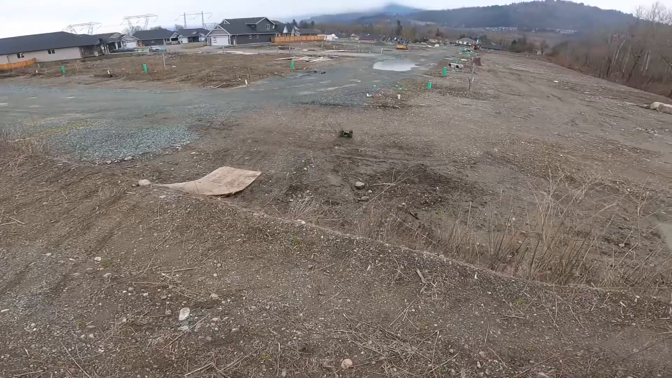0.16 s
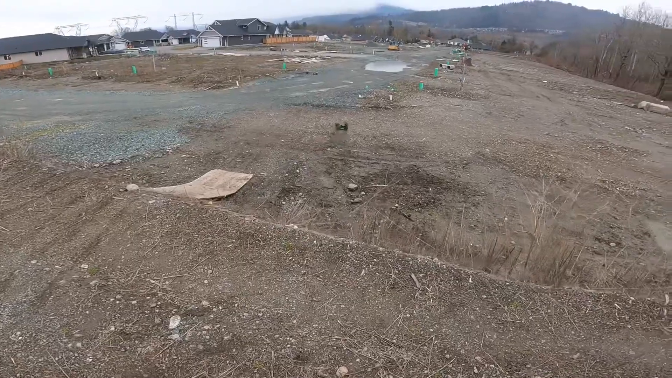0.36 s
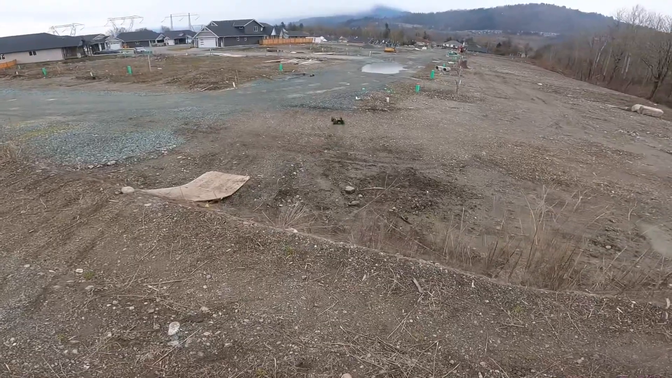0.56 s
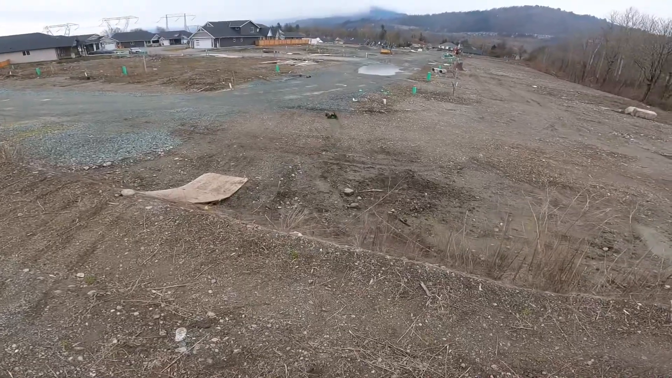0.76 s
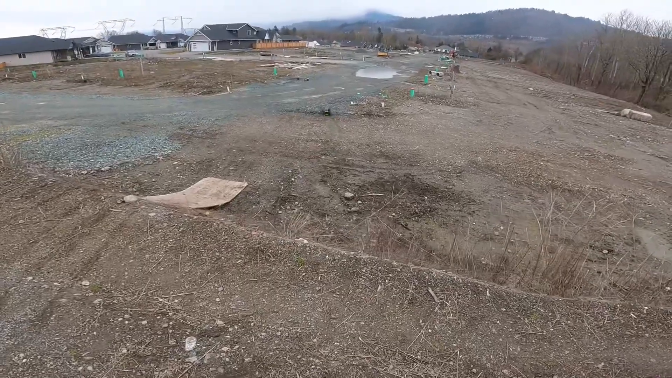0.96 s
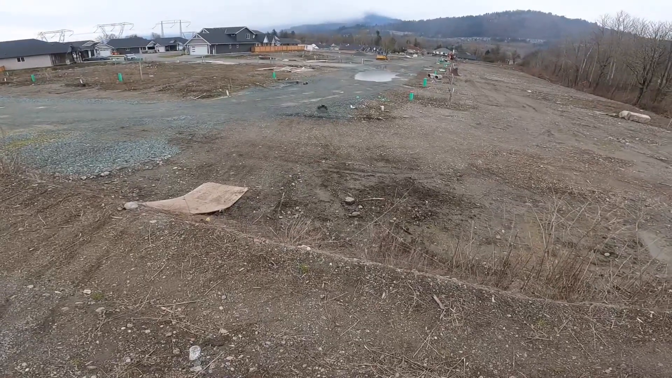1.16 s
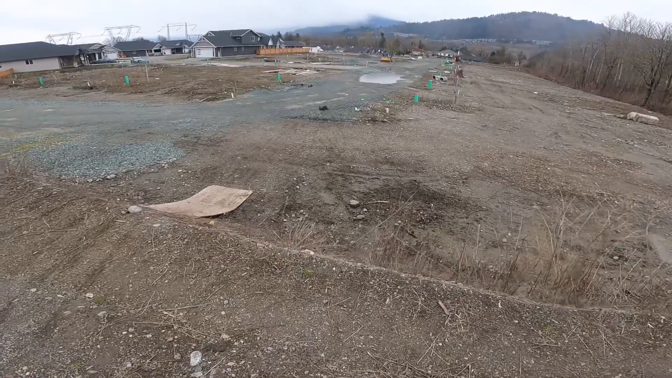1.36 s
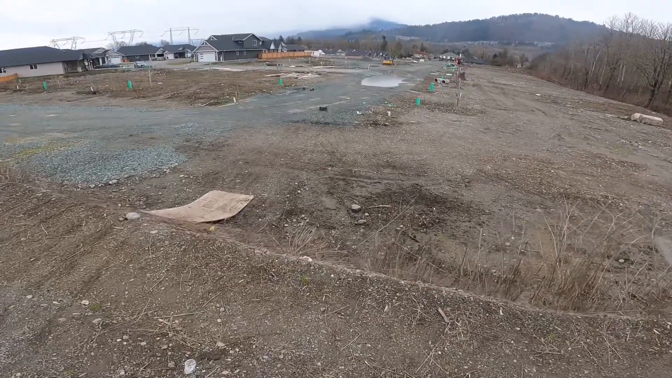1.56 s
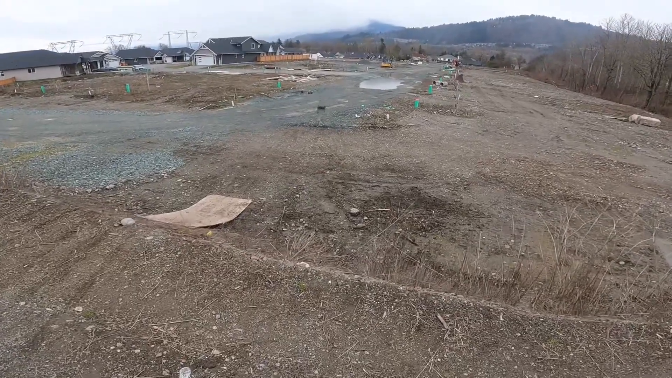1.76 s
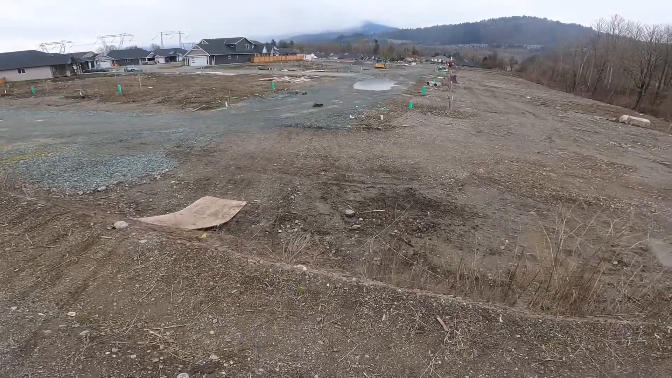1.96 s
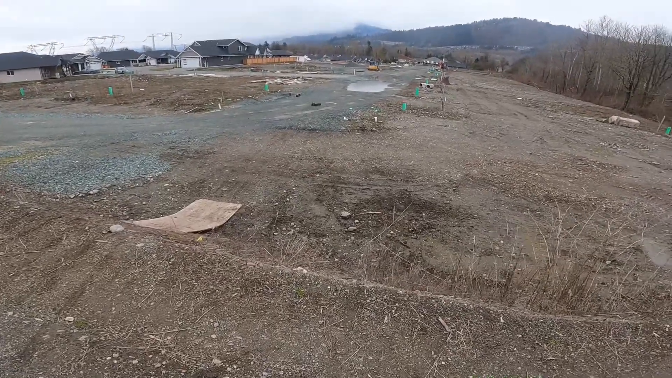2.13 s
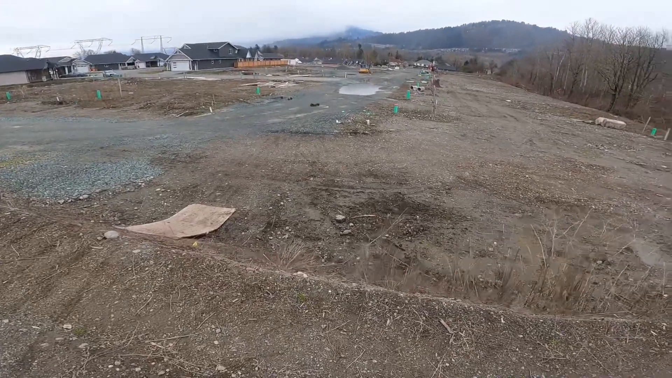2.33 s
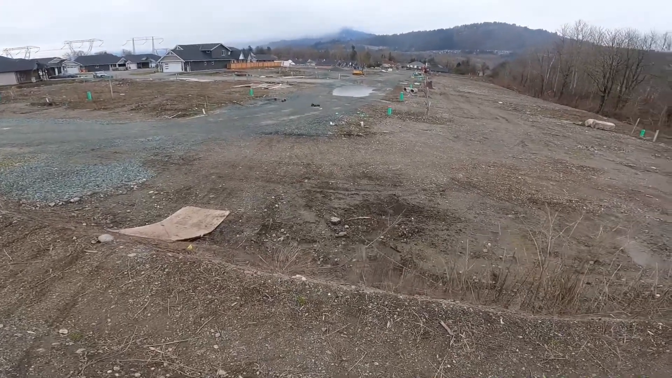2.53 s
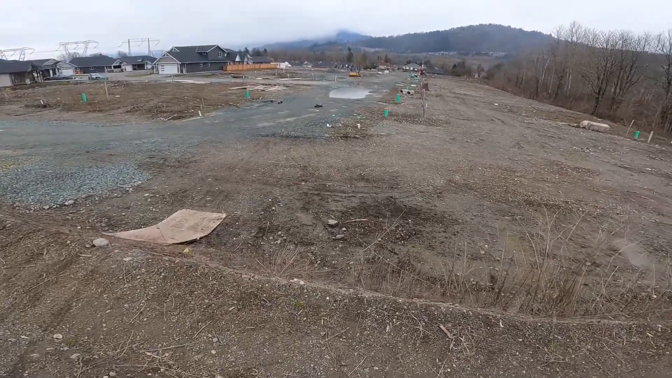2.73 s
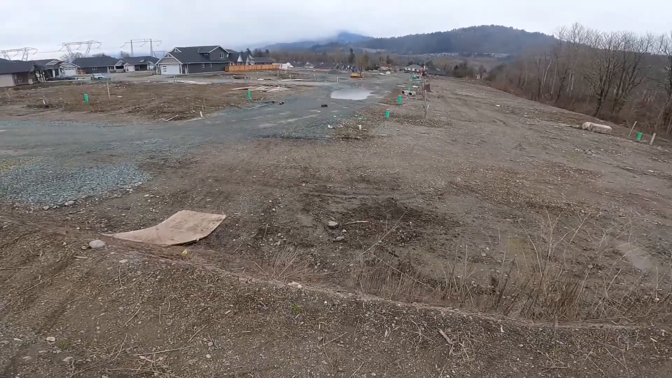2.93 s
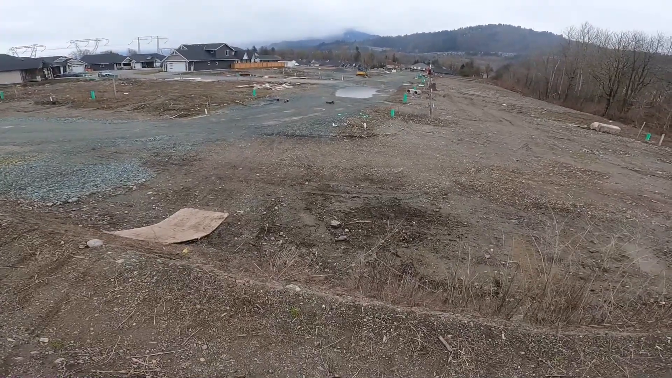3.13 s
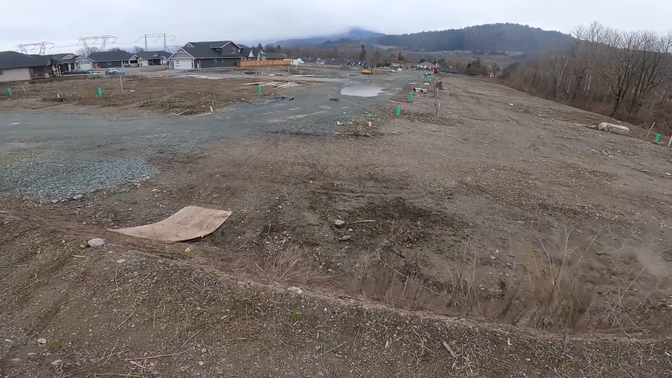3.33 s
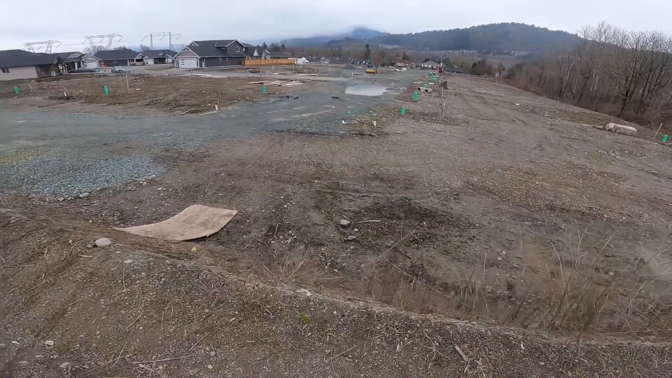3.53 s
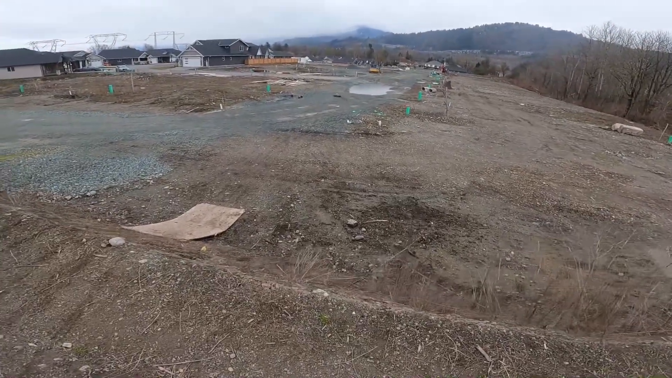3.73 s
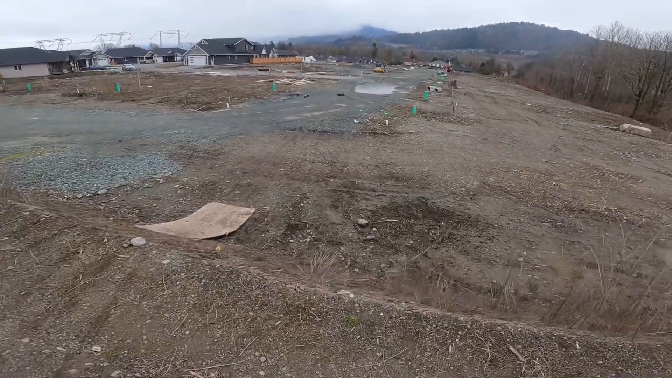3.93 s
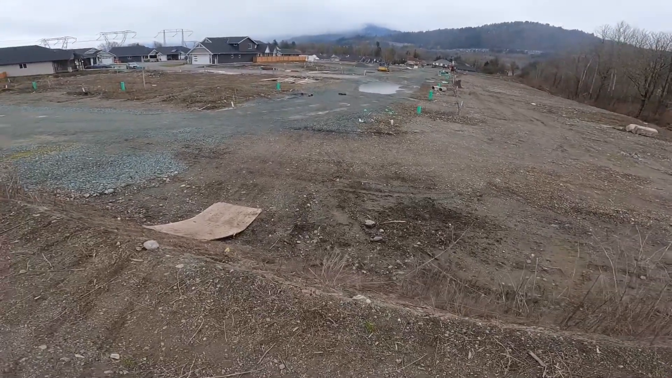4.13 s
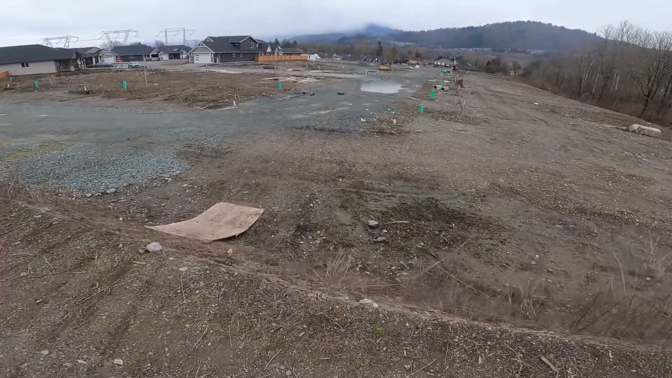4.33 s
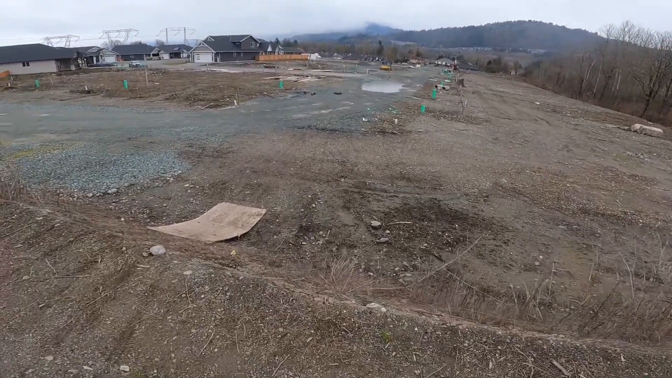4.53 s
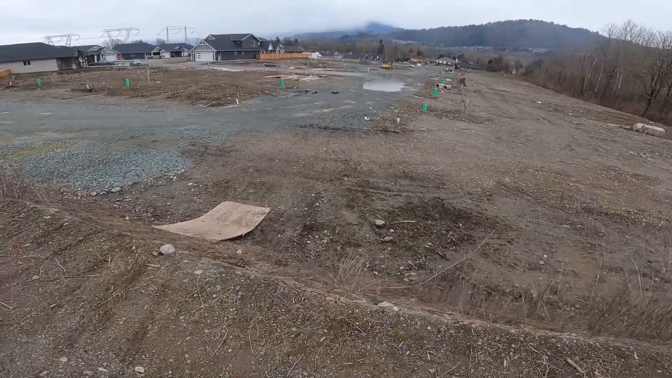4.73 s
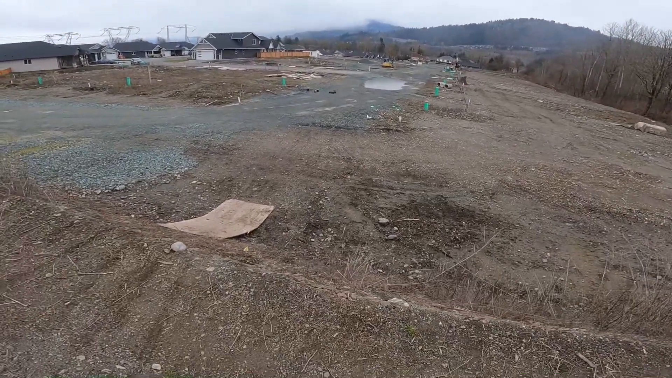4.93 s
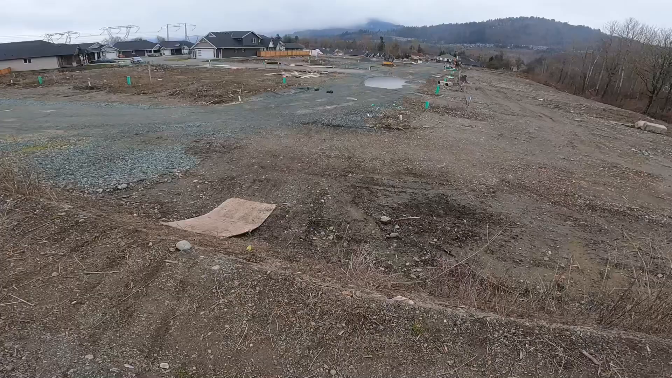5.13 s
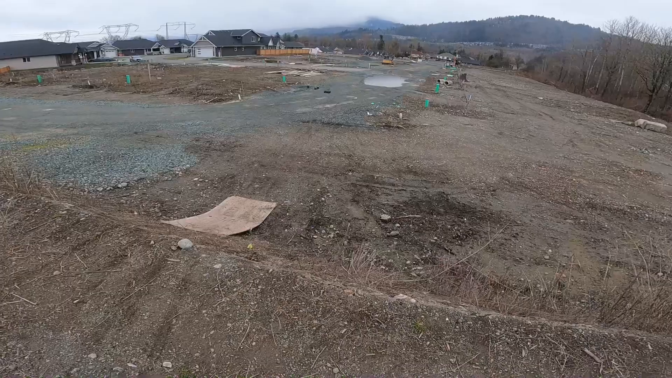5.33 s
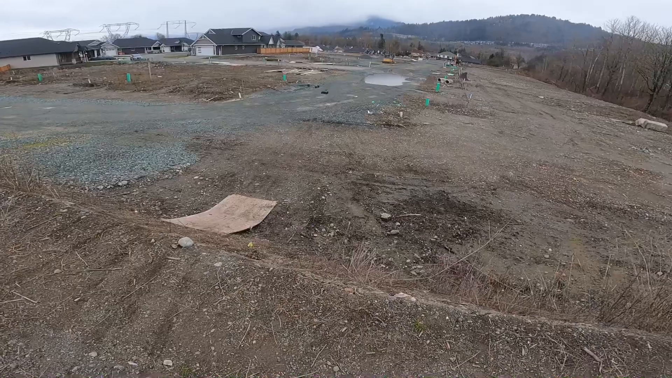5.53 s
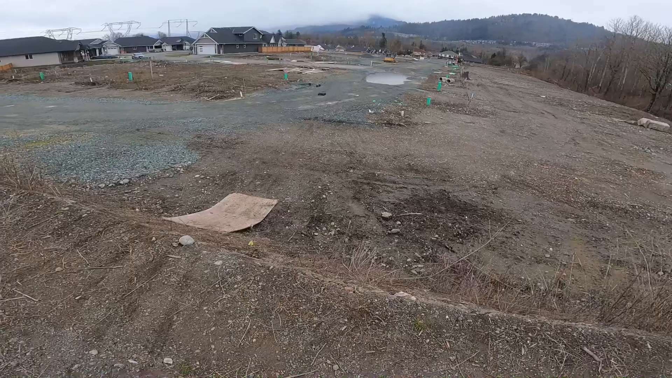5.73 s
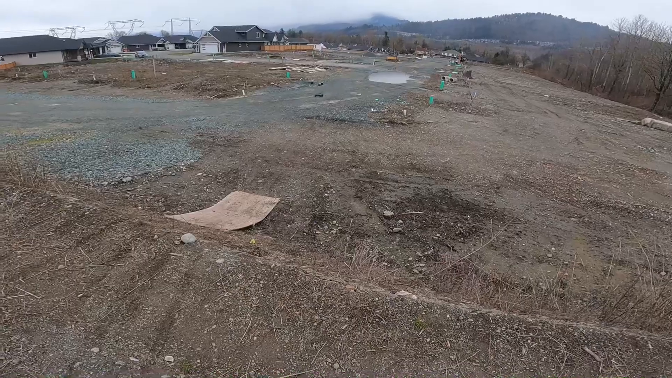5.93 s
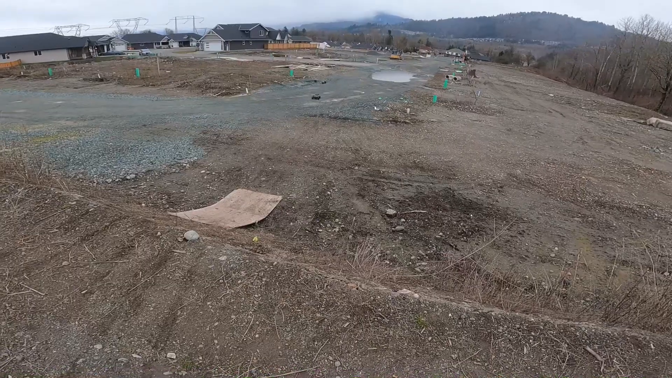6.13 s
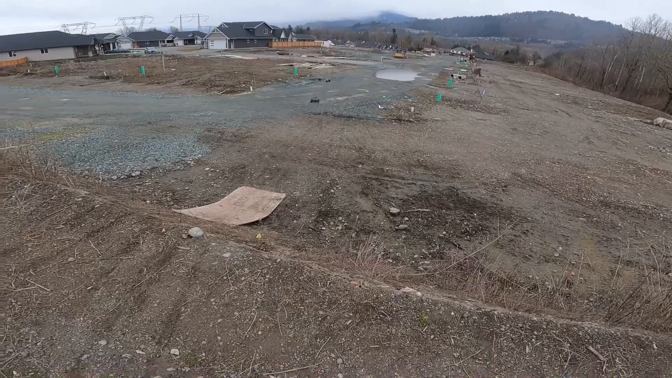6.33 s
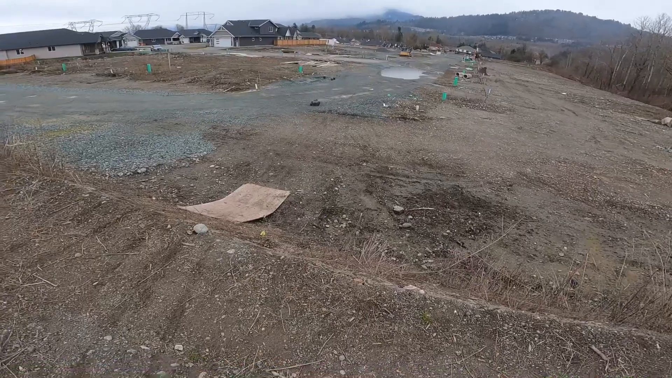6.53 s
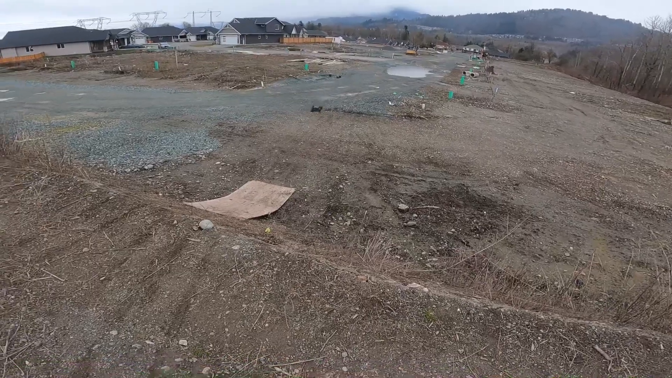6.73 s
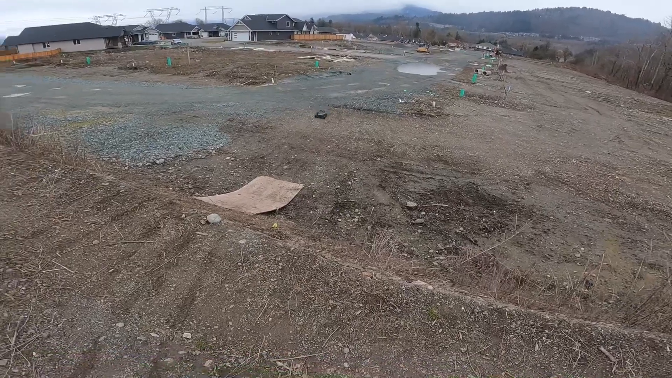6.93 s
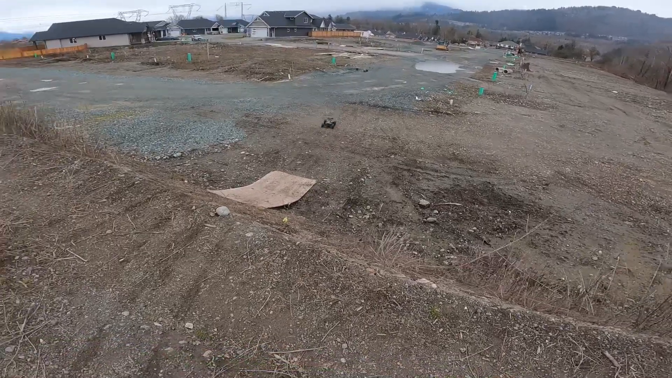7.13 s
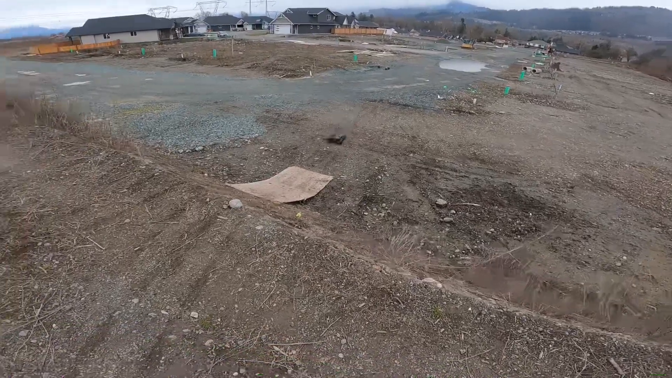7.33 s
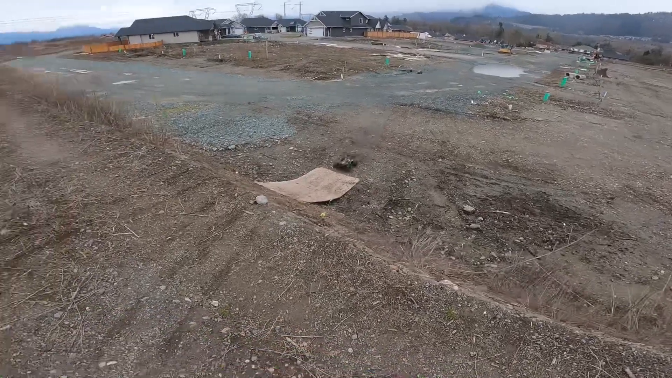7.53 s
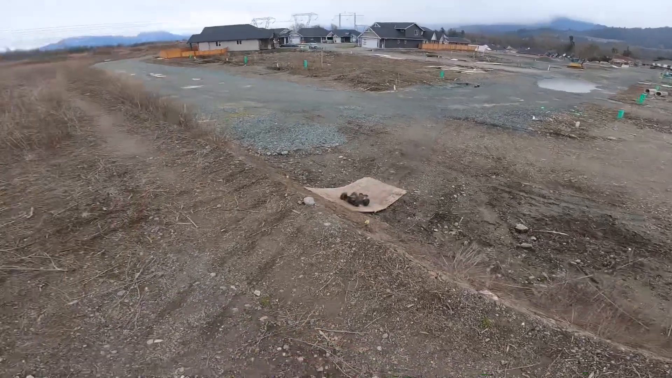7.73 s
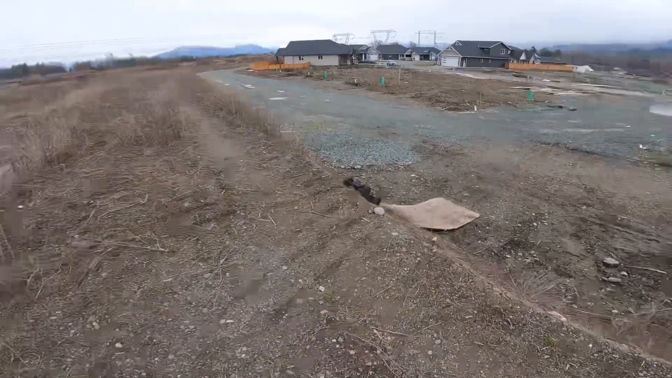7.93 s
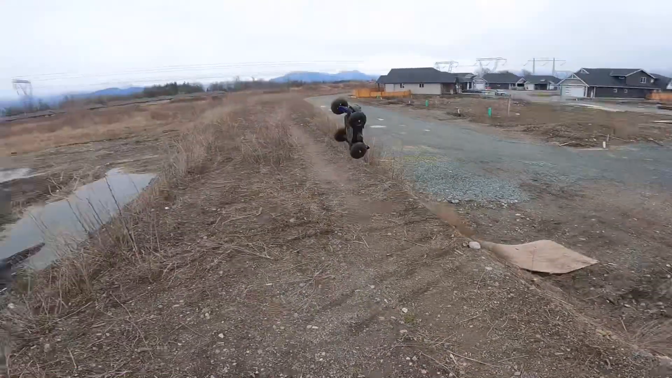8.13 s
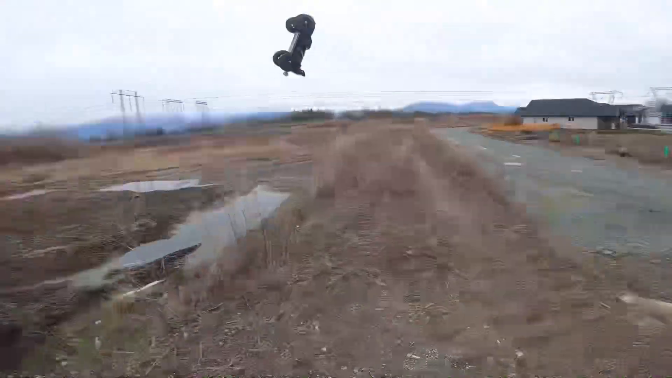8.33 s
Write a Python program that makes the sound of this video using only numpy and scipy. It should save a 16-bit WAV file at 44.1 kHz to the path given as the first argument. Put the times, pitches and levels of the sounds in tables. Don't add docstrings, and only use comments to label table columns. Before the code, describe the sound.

A small electric truck whines away over loose dirt, circles back faster, then clatters across a plywood ramp and whizzes past in the air.

```python
import sys
import numpy as np
from scipy import signal
from scipy.fft import rfft, irfft, next_fast_len
from scipy.io import wavfile
from scipy.ndimage import uniform_filter1d, map_coordinates

SR = 44100
rng = np.random.default_rng(int(sys.argv[2]) if len(sys.argv) > 2 else 0)


def magnitude_from_level(level_db):
    exponent = np.asarray(level_db, float) / 20
    return 10 ** exponent


def wrap_up_sound(samples):
    columns = np.atleast_2d(samples).T
    tamed = np.clip(columns, -1, 1)
    steps = np.round(tamed * 32767).astype(np.int16)
    wavfile.write(sys.argv[1], SR, steps)


N = 373527


def unit(x):
    return x / np.sqrt(np.mean(x ** 2) + 1e-20)


def along(points, hz):
    f, v = np.transpose(points)
    return np.interp(np.log(hz + 1), np.log(f + 1), v)


def curves(rows):
    s, *cols = np.transpose(rows)
    return [np.interp(np.arange(N) / SR, s, c) for c in cols]


def spans(rows, edge_s):
    t = np.arange(N) / SR
    return sum(db * np.clip(np.minimum(t - s, s + length - t) / edge_s, 0, 1) for s, length, db in rows)


def joined(tables):
    edges = [(table[end][0] + step, table[end][1]) for table in tables for end, step in ((0, -.012), (-1, .012))]
    alone = [e for e in edges if not any(t[0][0] <= e[0] <= t[-1][0] for t in tables)]
    played = [tuple(row) for table in tables for row in table]
    silent = [(s, hz, -99) for s, hz in alone]
    return curves(sorted(played + silent))


def wobble(rate):
    knots = rng.standard_normal(int(N * 400 / SR) + 4)
    return map_coordinates(knots, [np.arange(N) * min(rate, 400) / SR])


def coloured(x, spectrum):
    m = next_fast_len(N + 8192)
    gain = magnitude_from_level(along(spectrum, np.fft.rfftfreq(m, 1 / SR)))
    return irfft(rfft(x, m) * gain, m)[..., :N]


def rattle(spectrum, patchy_db, per_s, burst_s, share):
    z = signal.stft(rng.standard_normal(N), nperseg=512)[2]
    field = uniform_filter1d(rng.standard_normal(z.shape), size=5, axis=0)
    field = uniform_filter1d(field, size=8, axis=1)
    bed = signal.istft(z * magnitude_from_level(patchy_db * unit(field)), nperseg=512)[1][:N]
    size_db = 3.7 * np.clip(rng.standard_normal(N), -3, 1.4)
    hits = (rng.random(N) < per_s / SR) * magnitude_from_level(size_db)
    flares = signal.lfilter([1], [1, -np.exp(-1 / (burst_s * SR))], hits)
    return unit(coloured(bed * (1 + share * flares), spectrum))


def struck(events, cycles, noise, gain_db):
    out, t = np.zeros(N + SR), np.arange(SR // 8) / SR
    for s, db, hz in events:
        kernel = np.diff(np.hanning(int(SR / hz) + 3))
        rough = np.convolve(rng.standard_normal(len(t)), kernel, "same") * np.sqrt(SR / hz / 4)
        ring = np.sin(2 * np.pi * hz * t) + noise * rough
        out[round(s * SR):][:len(t)] += magnitude_from_level(db + gain_db - 60 * t * hz / cycles) * ring
    return out[:N]


# start in seconds, end in seconds, pitch in Hz, level in dB.
FAR_HUM = [
    (3.9, 5.5, 154, -50),
    (0, .5, 90, -52),
]


def far_hum():
    t = np.arange(N) / SR
    out = np.zeros(N)
    for start, end, hz, db in FAR_HUM:
        fade = np.clip(np.minimum(t - start, end - t) / 0.13, 0, 1)
        tone = np.sin(2 * np.pi * hz * t + 0.55 * wobble(16))
        out += magnitude_from_level(db + 0.59 * wobble(15.0)) * fade * tone
    return out


# peak time in seconds, peak level in dB.
GUSTS = [
    (0.0, -39),
    (1.01, -37),
    (1.82, -39.5),
    (2.14, -38),
    (2.6, -37),
    (3.39, -31.5),
    (4.17, -37),
    (7.1, -50),
    (7.83, -43),
]
# time in seconds, level in dB.
BREEZE = [(0, -58), (.9, -41), (1.25, -47), (2, -43.5), (7.9, -50.5), (8.2, -72)]
# frequency in Hz, density in dB per Hz.
BUFFET = [(8.8, -33), (15, 0), (53, 2.5), (123, -5), (170, -5), (220, -89), (370, -120)]


def wind():
    rise, fall = 37, 58
    t = np.arange(N) / SR
    gusts = [db - np.where(t < s, rise * (s - t), fall * (t - s)) for s, db in GUSTS]
    level_db = np.max([curves(BREEZE)[0], *gusts], axis=0)
    return magnitude_from_level(level_db) * rattle(BUFFET, patchy_db=1.3, per_s=9.1, burst_s=0.03, share=1.0)


# time in seconds, peak in dB.
SNAPS = [(0.0977, -39), (0.172, -37), (0.2079, -39), (0.3, -42), (0.3112, -36), (0.4264, -40), (0.549, -43),
         (1.507, -30), (1.53, -29.5), (1.747, -44), (1.915, -46), (2.0256, -35), (2.0895, -40),
         (2.196, -37), (2.4115, -33.5), (2.486, -36), (2.537, -37.5), (2.789, -46), (2.81, -54),
         (3.3136, -37), (3.4027, -46), (3.5523, -47), (3.5814, -51), (5.288, -40), (6.4198, -32),
         (7.7411, -20), (7.7567, -14.5), (7.7854, -33), (7.804, -11), (7.8118, -23), (8.0994, -24),
         (8.1397, -24)]
STALK_HZ = [2400, 6200]


def snaps():
    out, t = np.zeros(N + SR), np.arange(SR // 20) / SR
    for s, db in SNAPS:
        crackle = 0.54 * rng.standard_normal(len(t)) + (t == 0)
        out[round(s * SR):][:len(t)] += magnitude_from_level(db + 9 - 60 * t / 0.024) * crackle
    band = signal.butter(2, STALK_HZ, "bandpass", fs=SR, output="sos")
    return signal.sosfilt(band, out[:N])


# time in seconds, peak in dB, pitch in Hz.
BLOWS = [(1.417, -19, 192), (1.498, -15, 162), (2.09, -20, 164), (3.238, -20.5, 112), (3.391, -18, 70),
         (3.44, -22, 72.87), (6.781, -13, 182), (7.581, -8, 210.4), (7.669, -8, 210), (7.705, -7.5, 190),
         (7.727, -4.5, 120.4), (7.768, -16, 129), (7.81, -3, 106), (7.87, -12, 124.5), (7.888, -18, 95),
         (8.009, -10, 291), (8.03, -21, 62.2)]
# time in seconds, peak in dB, pitch in Hz.
SLAPS = [(0.311, -28, 2060), (0.3115, -23, 950), (0.312, -25, 3600), (1.507, -21.5, 1040),
         (1.529, -24, 2370), (2.486, -22.5, 3280), (3.099, -25, 1200), (3.383, -23.5, 1800),
         (3.386, -26, 2570), (3.39, -32, 3200), (3.388, -23, 970), (7.59, -8.5, 1060), (7.705, -4.5, 1450),
         (7.768, -1, 1530), (7.804, -6, 1070), (7.855, -5, 870), (7.888, -11, 1020), (8.097, -20, 2513),
         (8.11, -12, 1700), (8.119, -12, 1330), (8.127, -12, 1440), (8.128, -13, 3700), (8.134, -21, 1050),
         (8.152, -15, 1050), (8.172, -17, 1000), (8.177, -9.5, 1696), (8.176, -16, 3400)]
# time in seconds, peak in dB, pitch in Hz.
PINGS = [(0.3087, -40, 7000), (1.4336, -36, 6500), (1.785, -46, 5480), (1.9699, -43.5, 6940),
         (2.0108, -44, 7220), (2.287, -44, 7500), (3.1692, -41, 5800), (3.458, -48, 5500),
         (3.468, -44, 5300), (7.707, -21, 10000), (7.742, -26, 9100), (7.756, -20, 9700),
         (7.764, -23, 7100), (7.771, -23, 7000), (7.776, -25, 6760), (7.78, -23, 6900), (7.786, -21, 9760),
         (7.8035, -26, 9000), (7.8125, -23, 9700), (7.854, -27, 9500), (7.862, -27, 9800),
         (7.888, -30, 10400)]


def impacts():
    blows = struck(BLOWS, cycles=17.0, noise=0.47, gain_db=-7.0)
    slaps = struck(SLAPS, cycles=33, noise=0.6, gain_db=-6.5)
    return blows + slaps + struck(PINGS, cycles=55, noise=0.4, gain_db=-3)


# start in seconds, length in seconds, drumming lost in dB.
HOPS = [(0.026, 0.14, 4), (1.13, 0.28, 12), (2.447, 0.17, 6), (2.744, 0.2, 2.5), (3.292, 0.088, 7),
        (6.574, 0.046, 26), (6.634, 0.087, 20), (6.825, 0.097, 16), (7.472, 0.15, 5), (7.823, 0.049, 30),
        (7.925, 0.086, 1), (8.073, 0.6, 21.5)]
LIFT_S = 0.033
# start in seconds, length in seconds, lift in dB.
BLIPS = [
    (-.03, 0.088, 6.5),
    (.27, 0.081, 5),
    (2.66, 0.066, 19),
    (4.51, 0.1, 6),
    (5.28, 0.058, 10),
    (8.04, 0.12, 10.5),
]
STAB_S = 0.077
# time in seconds, share 0-1.
PACE = [(0, 1), (1.1, 0.79), (1.5, 0.09), (5.5, 0.16), (6.2, 0.8), (7.45, 1), (7.65, 0.58)]
# time in seconds, share 0-1.
NEAR = [(0, 0.23), (7.4, 0.5), (7.599, 1)]
# time in seconds, level in dB.
TYRES = [(0, -45.5), (0.19, -43), (1.4, -44.5), (2.38, -43.5), (2.9, -47), (3.26, -38.5), (3.5, -43.5),
         (4.46, -46.5), (5.21, -44.5), (5.7, -40.5), (6.55, -37), (7.12, -34), (7.55, -31), (7.71, -23),
         (7.88, -24.5), (7.95, -29), (8.16, -27.5), (8.47, -30)]
# time in seconds, lift in dB.
RUTTED = [(0, 7), (3.5, 5.5), (4.4, -2.5), (5.3, -1.5), (6.5, 1.5), (7.2, 3), (7.7, -1), (8, 1.5)]
# frequency in Hz, density in dB per Hz.
DRUM = [(41, -52), (70, -2.5), (123, -7.5), (215, 4), (356, -10.5), (501, -7.5), (600, -10.5), (780, -17.5),
        (1320, -120)]
TRUNDLE = [(41, -17), (70, -3), (123, -4.5), (311, -1), (438, -8.5), (600, -10.5), (780, -10.5),
           (1320, -120)]
CHURN = [(190, -5), (330, -0.5), (590, -9), (636, -4), (920, 7.5), (1100, -4), (1230, -1.5), (1550, -7),
         (2000, -5.5), (2600, -20), (4400, -120)]
CLATTER = [(190, -26), (330, -18), (467, -2.5), (511, -6.5), (1080, 5), (1660, -3.5), (2000, -9),
           (2600, -18), (4400, -120)]


def tyres(jolt):
    pace, near = curves(PACE)[0], curves(NEAR)[0]
    lifted = spans(HOPS, LIFT_S)
    landings = [(s + length, 0.14, 0.5) for s, length, _ in HOPS]
    tyre_db = curves(TYRES)[0] + spans(landings, 0.07)
    drum_db = tyre_db + curves(RUTTED)[0] - lifted
    churn_db = tyre_db - 0.95 * (1 - near) * lifted + 0.12 * near * spans(BLIPS, STAB_S)
    fast, slow = (rattle(s, patchy_db=0.56, per_s=30, burst_s=0.013, share=0.74) for s in (DRUM, TRUNDLE))
    dirt, ramp = (rattle(s, patchy_db=2.0, per_s=100, burst_s=0.0032, share=0.47) for s in (CHURN, CLATTER))
    drum = magnitude_from_level(drum_db + 0.84 * jolt) * (np.sqrt(pace) * fast + np.sqrt(1 - pace) * slow)
    churn = magnitude_from_level(churn_db + 0.58 * jolt) * (np.sqrt(1 - near) * dirt + np.sqrt(near) * ramp)
    return drum + churn


# time in seconds, level in dB.
GEARBOX = [(0, -43), (.23, -46.5), (.35, -41), (1.44, -43), (2.38, -44), (2.62, -54), (3.02, -46),
           (3.37, -45), (3.53, -53.5), (3.8, -49.5), (3.89, -46), (5.2, -48), (5.35, -41.5), (6.4, -37.5),
           (7.57, -28.5), (7.76, -21.5), (7.97, -32.5), (8.12, -25)]
USUAL_DB = -44


def load_db():
    return curves(GEARBOX)[0] + spans(BLIPS, STAB_S)


# start in seconds, length in seconds, treble lost in dB.
FARTHEST = [
    (4.25, 0.66, 11),
]
# time in seconds, share 0-1.
FACING = [(0, 0.1), (4.7, 0.7), (5.7, 0.95)]
# frequency in Hz, density in dB per Hz.
GRIT_AWAY = [(2350, -11), (4000, 0), (4530, -7), (6190, -7), (7040, -7), (7600, -13), (8230, -11),
             (10600, -34), (11600, -21), (15100, -56), (22000, -120)]
GRIT_BACK = [(2350, -10.5), (4000, -2.5), (5470, -1), (6320, -9), (7270, -6), (8230, -13), (9680, -12.5),
             (14500, -31)]


def grit(jolt):
    facing = curves(FACING)[0]
    grows_db = 0.3 * (curves(GEARBOX)[0] - USUAL_DB)
    level_db = load_db() - 10 + grows_db - spans(FARTHEST, 0.63)
    far, close = (rattle(s, patchy_db=2.0, per_s=45, burst_s=0.0019, share=0.79) for s in (GRIT_AWAY, GRIT_BACK))
    return magnitude_from_level(level_db - 1.2 + 0.68 * jolt) * (np.sqrt(1 - facing) * far + np.sqrt(facing) * close)


# frequency in Hz, density in dB per Hz.
RASP = [(820, -11), (1400, -2.5), (1650, -1), (2070, -2), (2490, 1.5), (2780, 1), (3470, 1), (4800, -10.5),
        (6240, -23), (10600, -120)]
HOUSING = [(2700, -43), (3150, 1), (3400, 11), (3650, 6.5), (3900, -13), (4600, -51)]
# start in seconds, length in seconds, lift in dB.
PULLS = [(.26, 0.48, 7), (-0.2, .22, 4), (1.2, 0.36, 12), (-.05, 0.31, 3.5), (3.5, .17, 4), (4.6, .45, -2),
         (6, 0.13, 15), (4, 0.4, 6), (5, 0.454, 16.5), (6.1, 0.3, 8.5), (8.5, 0.12, 6)]


def gearbox(jolt):
    rasp_db = load_db()
    ring_db = rasp_db - 10 + 12 * curves(PACE)[0] - 6 * curves(NEAR)[0] + spans(PULLS, 0.053)
    rasp = rattle(RASP, patchy_db=2.0, per_s=54, burst_s=0.0031, share=0.8)
    ring = rattle(HOUSING, patchy_db=-0.7, per_s=40, burst_s=0.0015, share=0.23)
    return magnitude_from_level(rasp_db - 2.0 + 0.43 * jolt) * rasp + magnitude_from_level(ring_db - 8.5 + 0.77 * jolt) * ring


def rolling_truck():
    jolt = 1.32 * wobble(18) + 1.0 * wobble(40)
    return tyres(jolt) + gearbox(jolt) + grit(jolt)


# frequency in Hz, density in dB per Hz.
CASING = [(4300, -52), (4800, -7), (5300, -3), (5750, -9), (6300, -42)]
CAP = [(8000, -50), (8900, -3), (9600, 0), (10200, -12), (11200, -50)]
SHAFT = [(6500, -45), (7000, -6), (7400, 1), (7800, -6), (8300, -45)]
# start in seconds, length in seconds, lift in dB.
BRAKING = [
    (.31, .16, 5),
    (2.95, 0.55, 1),
    (3.58, 0.4, 12.5),
    (4.45, 0.84, 0),
    (5.45, 2, 4.5),
    (8.17, .5, 10),
]
# start in seconds, length in seconds, lift in dB.
SHAFT_ON = [
    (4.6, 1.0, 12),
    (5.5, 1.15, 10),
    (6.1, 1.5, 15),
]


def motor_can():
    can_db = load_db() - 22 + spans(BRAKING, 0.077) + 1.1 * wobble(20)
    cap_db = load_db() - 23 + 2.5 * wobble(40)
    shaft_db = load_db() - 32.5 + spans(SHAFT_ON, 0.47)
    close = curves(NEAR)[0] ** 3
    can = magnitude_from_level(can_db) * rattle(CASING, patchy_db=2.5, per_s=20, burst_s=.003, share=.3)
    cap = close * magnitude_from_level(cap_db) * rattle(CAP, patchy_db=-2.0, per_s=60, burst_s=0.0029, share=0.86)
    return can + cap + magnitude_from_level(shaft_db) * rattle(SHAFT, patchy_db=5.5, per_s=30, burst_s=.003, share=.2)


def whine(tables, warble_hz, rough, overtone):
    teeth = 50
    hz, first_db = joined(tables)
    turn = 2 * np.pi * np.cumsum(hz * (1 + 0.1053 * wobble(12))) / SR / teeth
    drift = .004 * wobble(25) + .33 * rough * wobble(200)
    phase = 2 * np.pi * np.cumsum(hz * (1 + drift) + warble_hz * np.sin(turn)) / SR
    load = magnitude_from_level(2.6 * np.sin(turn + 1.34) + 1.9 * wobble(35))
    chatter = np.clip(14 * rough, 0, 1)
    wide = np.clip(50 * (rough - .042), 0, 1)
    spread = unit(uniform_filter1d(rng.standard_normal(N), size=SR // 480))
    strikes = np.sqrt(1 - wide) * unit(wobble(400)) + np.sqrt(wide) * spread
    load = load * (np.sqrt(1 - chatter) + np.sqrt(chatter) * strikes)
    out = np.zeros(N)
    for k, db in enumerate((first_db, first_db + along(overtone, hz))):
        out += magnitude_from_level(db) * unit(load * magnitude_from_level(1.46 * wobble(60))) * np.sin((k + 1) * phase)
    return np.sqrt(2) * out


# time in seconds, tooth rate in Hz, level in dB.
AXLE = [
    [(0, 6970, -63), (.22, 6980, -63), (.3, 7050, -59), (.4, 6900, -64.5), (.55, 7000, -64),
     (.7, 7340, -69), (.76, 7300, -66.5)],
    [(1.17, 1380, -54), (1.3, 1340, -49), (1.4, 1400, -48)],
    [(1.52, 2700, -55), (1.61, 3000, -49), (1.7, 3000, -58)],
    [(1.78, 2799, -64), (1.852, 2706, -46.5), (2.15, 2686, -46), (2.38, 2630, -58)],
    [(2.76, 3205, -60), (3.044, 3566, -49.5), (3.08, 3420, -63)],
    [(3.95, 2620, -56), (4.15, 2640, -56), (4.4, 2640, -58)],
    [(4.52, 2544, -46.5), (4.59, 2680, -46.5), (4.75, 2674, -55), (5.1, 2620, -61)],
    [(5.3, 1227, -47), (5.5, 1156, -47), (5.72, 1170, -48)],
    [(5.74, 2680, -50), (5.78, 2686, -47), (5.97, 2640, -50), (6.2, 2700, -55)],
    [(8.06, 1500, -36), (8.105, 1720, -29), (8.122, 1500, -26), (8.135, 1180, -26), (8.15, 1250, -38)],
    [(8.165, 1150, -44), (8.19, 1150, -40), (8.24, 1220, -38), (8.32, 1130, -39), (8.43, 1260, -42),
     (8.46, 1206, -38)],
]


def axle_gears():
    return whine(AXLE, warble_hz=35.17, rough=0.0267, overtone=[(1000, -60)])


# time in seconds, pitch scatter share.
SLACK = [(0, .014), (.3, .006), (1.1, .008), (1.5, .02), (2.85, .022), (2.95, .015), (3.17, .018),
         (3.2, .045), (3.8, .02), (4, .011), (5.68, .013), (5.75, .04), (5.83, .022), (6.1, .03),
         (6.16, .052), (6.9, .05), (6.96, .036), (7.2, .04), (7.6, .05), (7.8, .014), (8.0, .026),
         (8.06, .022), (8.08, .008)]
# time in seconds, tooth rate in Hz, level in dB.
LEAVING = [
    [(0.0, 2570, -40.5), (0.12, 2450, -44.5)],
    [(0.25, 1930, -58), (0.27, 1960, -44), (0.315, 2150, -36), (0.335, 2060, -38.5), (0.41, 2140, -39),
     (0.432, 2350, -39), (0.455, 2250, -34), (0.63, 2290, -38.5), (0.66, 2370, -47)],
    [(0.665, 2380, -49), (0.705, 2520, -41), (0.74, 2350, -45), (0.84, 2510, -53), (0.87, 2524, -43),
     (1.115, 2570, -41), (1.13, 2330, -35)],
    [(1.135, 2320, -39), (1.15, 2330, -46), (1.168, 2100, -42), (1.21, 2040, -39), (1.3, 2100, -37.5),
     (1.35, 2080, -41.5), (1.4, 1980, -43), (1.46, 2180, -43), (1.5, 2250, -58)],
    [(1.505, 2126, -55), (1.73, 2170, -53), (2.09, 2130, -52), (2.294, 2060, -57), (2.374, 1724, -46.5),
     (2.68, 1752, -60.5)],
    [(2.9, 2080, -60), (2.95, 1960, -47), (2.978, 2150, -45), (3.0, 2490, -44), (3.022, 2140, -43),
     (3.042, 2490, -44), (3.064, 2230, -44)],
    [(3.066, 2280, -45), (3.086, 2630, -43), (3.106, 2530, -42), (3.13, 2700, -41), (3.16, 2620, -43),
     (3.175, 2700, -56)],
    [(3.19, 3100, -50), (3.23, 3000, -52), (3.27, 2880, -47), (3.3, 2950, -56), (3.33, 3100, -51),
     (3.36, 3050, -58)],
]
# time in seconds, tooth rate in Hz, level in dB.
RETURN = [
    [(3.83, 570, -52), (3.848, 600, -50), (3.858, 770, -46), (3.9, 880, -48), (3.935, 1020, -47),
     (3.985, 940, -43)],
    [(3.99, 930, -38), (4.025, 860, -38), (4.08, 1000, -42), (4.1, 990, -41), (4.15, 870, -37),
     (4.185, 990, -38), (4.27, 865, -37.5), (4.31, 930, -38), (4.37, 960, -36)],
    [(4.375, 1004, -35), (4.41, 1104, -46), (4.46, 1185, -42.5), (4.575, 1200, -44.5), (4.59, 1400, -50),
     (4.64, 1390, -46), (4.76, 1492, -49), (5.034, 1708, -49), (5.254, 1718, -44), (5.3, 1814, -45)],
    [(5.305, 1870, -44), (5.334, 2025, -48), (5.44, 2200, -49), (5.5, 2520, -42), (5.6, 2720, -38),
     (5.7, 2940, -41), (5.86, 3080, -43), (5.94, 3126, -44), (6.13, 3090, -50)],
]
# time in seconds, tooth rate in Hz, level in dB.
CHARGE = [
    [(6.15, 3570, -61), (6.308, 3555, -54), (6.916, 3780, -71), (6.978, 3710, -48.5), (7.508, 3980, -52.5),
     (7.56, 3870, -59)],
    [(7.83, 3005, -50), (7.845, 3170, -38), (7.856, 3140, -40)],
    [(7.95, 3500, -52), (8.0, 3250, -43), (8.02, 3280, -50), (8.03, 3620, -43), (8.045, 3480, -46),
     (8.056, 3720, -43)],
    [(8.07, 2690, -36), (8.086, 2540, -27), (8.093, 2520, -33), (8.099, 2520, -22), (8.115, 2540, -24),
     (8.127, 2480, -36), (8.14, 2460, -25), (8.155, 2500, -50)],
]
# tooth rate in Hz, level in dB.
OVERTONE = [(600, 1), (800, 8.5), (900, -8), (1250, -9.5), (1750, -2.5), (2100, -9), (2500, -6),
            (2750, -22), (3000, -35), (3500, 6)]
# tooth rate in Hz, level in dB.
HEAD_ON = [(2600, -18), (3000, 0), (3500, 5.5)]


def main_gears():
    slack = curves(SLACK)[0]
    loose = slack + .0027 * spans(HOPS[:5], LIFT_S)
    hidden = np.add(OVERTONE, [0, -17])
    leaving = whine(LEAVING, warble_hz=43.0, rough=loose, overtone=hidden)
    back = whine(RETURN, warble_hz=30.7, rough=slack, overtone=OVERTONE)
    return leaving + back + whine(CHARGE, warble_hz=30.0, rough=slack, overtone=HEAD_ON)


# frequency in Hz, density in dB per Hz.
THIN_HISS = [(11600, -70), (11800, 7), (12400, -3), (13200, 1), (14000, -16), (14400, -50)]
TOP = [(13300, -40), (13800, -1.5), (14800, -5), (15600, -10), (15800, -70)]


def treble_hiss():
    louder_db = uniform_filter1d(load_db(), size=4410) - USUAL_DB - spans(FARTHEST, 0.32)
    hiss_db = -77.5 + 1.03 * louder_db
    top_db = np.minimum(-12 + 1.5 * louder_db, -11)
    low, top = (unit(coloured(rng.standard_normal((2, N)), s)) for s in (THIN_HISS, TOP))
    balance_db = np.array([[.9], [-.9]])
    return magnitude_from_level(hiss_db + 1.5 + 2.5 * wobble(23) + balance_db) * (low + magnitude_from_level(top_db - 3.0) * top)


# frequency in Hz, level in dB.
SHARED = [(11600, 0), (11800, -6), (13500, -9), (14500, -30)]
# time in seconds, share 0-1.
WIDTH = [(0, 0), (2.3, 0.13), (2.9, 0.45), (3.1, 0.55), (4.1, 0.85), (8.47, 1)]
# frequency in Hz, side under mid in dB.
LEAN = [(25, -20), (60, -27), (400, -20.5), (1300, -21.5), (2400, -11.5), (3600, -21), (4800, -24),
        (5500, -26), (7200, -21), (8300, -23)]
# frequency in Hz, level in dB.
APART = [(30, -10), (150, -18), (1000, -21), (2500, -12), (4500, -26), (7000, -45)]


def scene():
    sources = far_hum() + wind() + snaps() + impacts() + rolling_truck() + motor_can() + axle_gears() + main_gears()
    mid = coloured(sources, SHARED)
    _, _, z = signal.stft(mid, SR, nperseg=1024)
    scattered = signal.istft(z * np.exp(2j * np.pi * rng.random(z.shape)), SR, nperseg=1024)[1][:N]
    side = curves(WIDTH)[0] * (coloured(scattered, APART) - coloured(mid, LEAN))
    return np.array([mid + side, mid - side]) + treble_hiss()


def top_cut(x):
    return signal.sosfilt(signal.butter(12, 15670, fs=SR, output="sos"), x)


def record(dry):
    top_level = .54
    rounded = dry / (1.5 + np.abs(dry / top_level) ** 4) ** (1 / 4)
    return top_cut(rounded)


dry = scene()
out = record(dry)
wrap_up_sound(out)
```